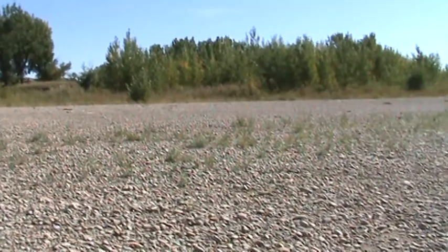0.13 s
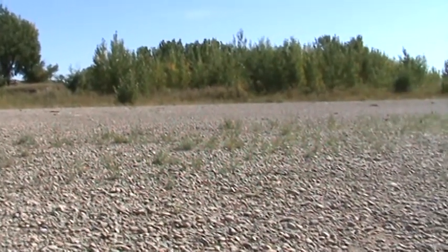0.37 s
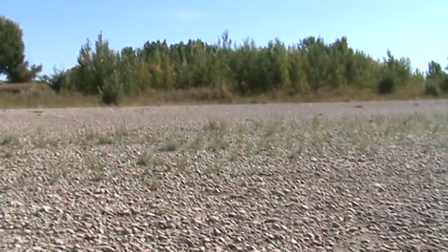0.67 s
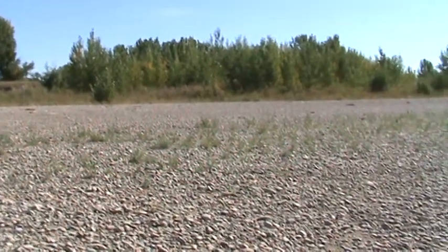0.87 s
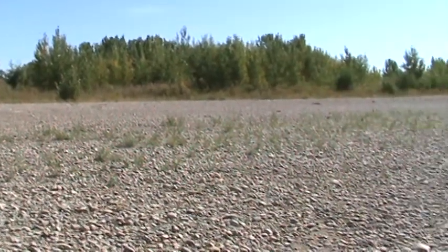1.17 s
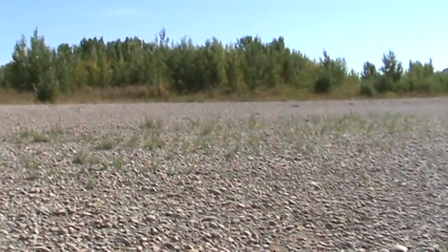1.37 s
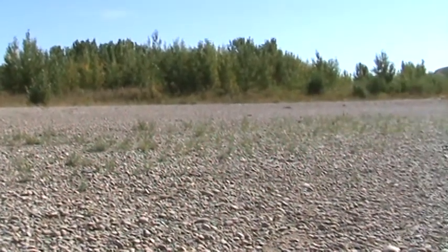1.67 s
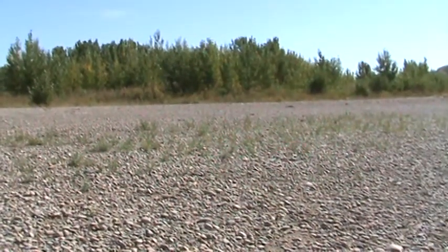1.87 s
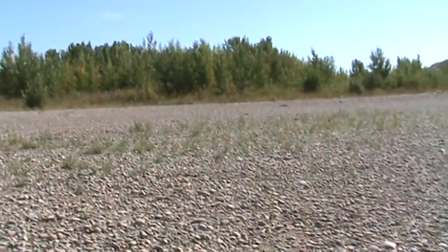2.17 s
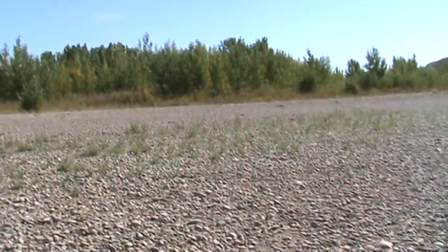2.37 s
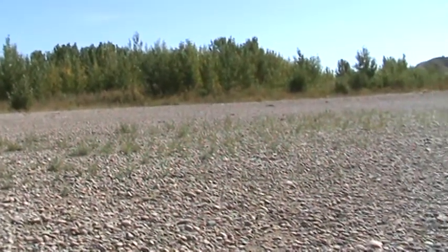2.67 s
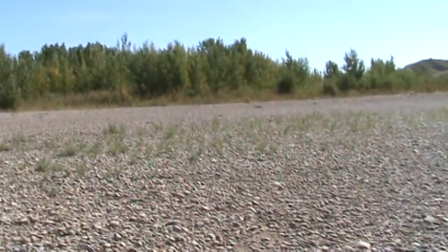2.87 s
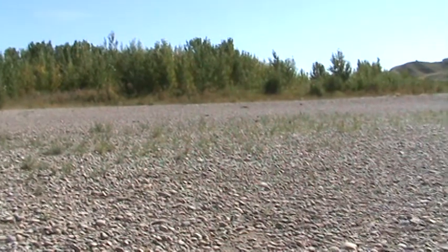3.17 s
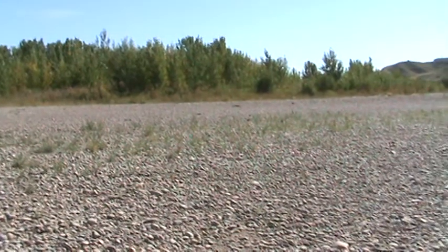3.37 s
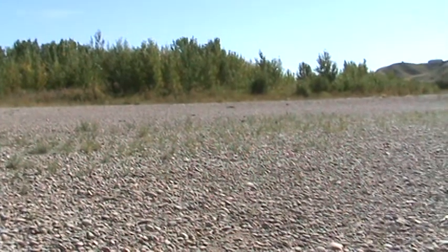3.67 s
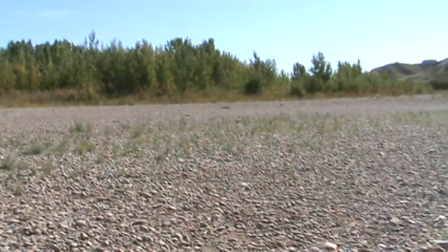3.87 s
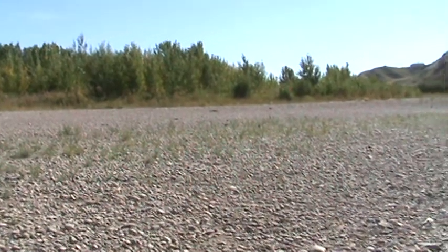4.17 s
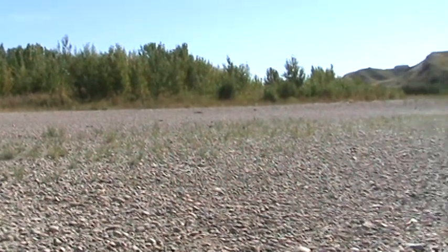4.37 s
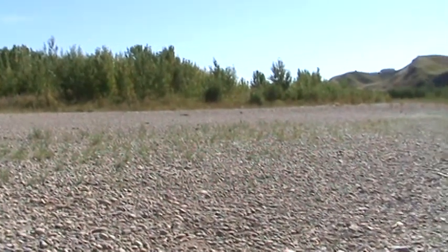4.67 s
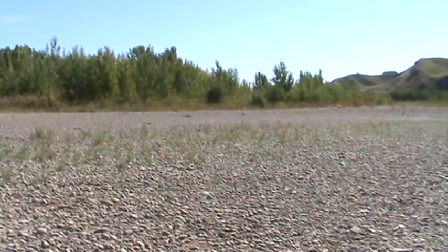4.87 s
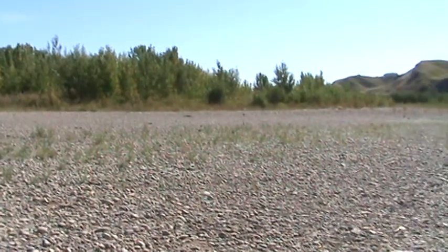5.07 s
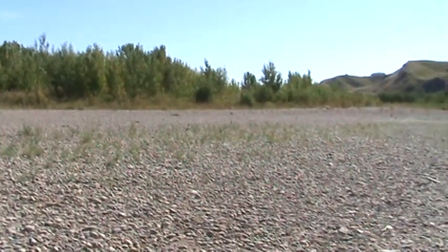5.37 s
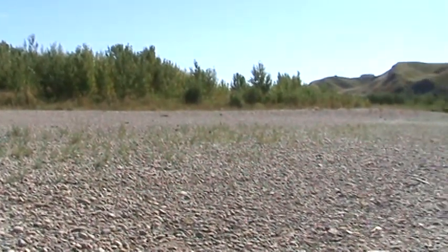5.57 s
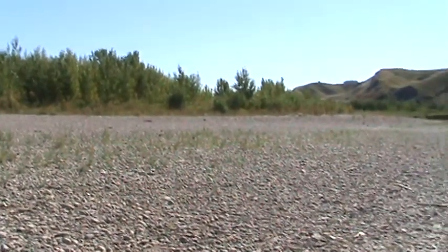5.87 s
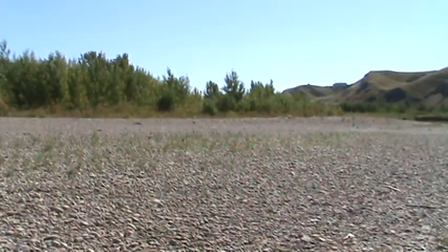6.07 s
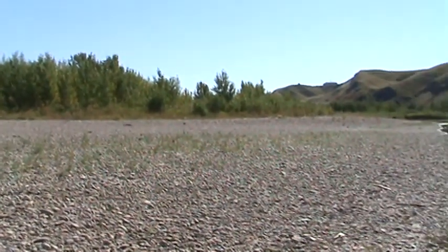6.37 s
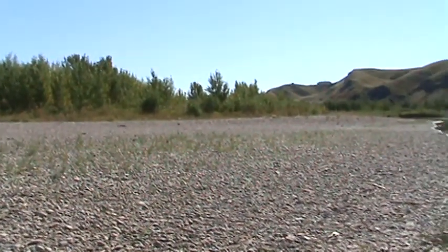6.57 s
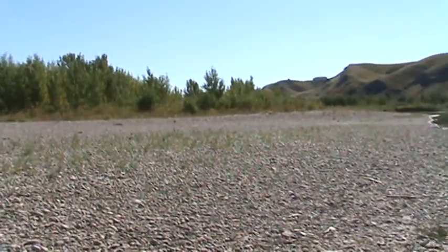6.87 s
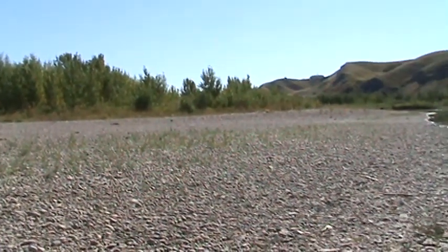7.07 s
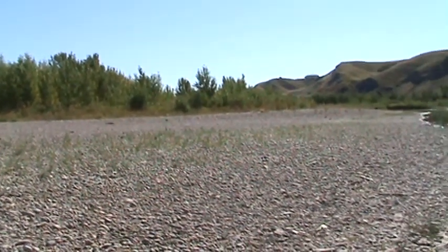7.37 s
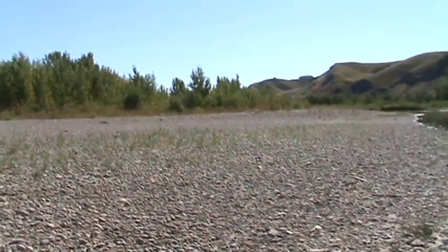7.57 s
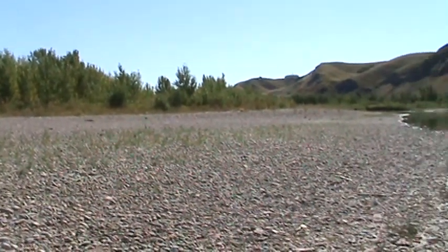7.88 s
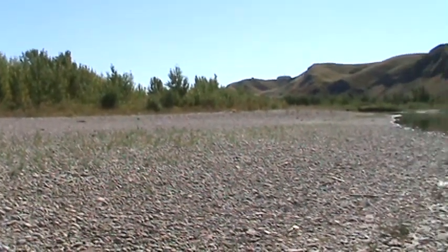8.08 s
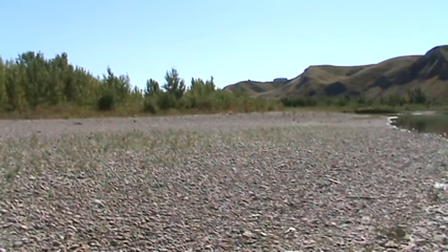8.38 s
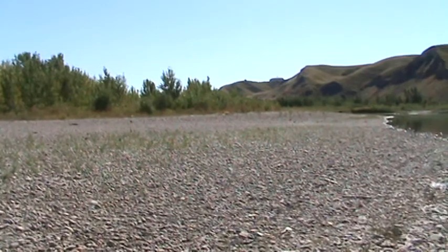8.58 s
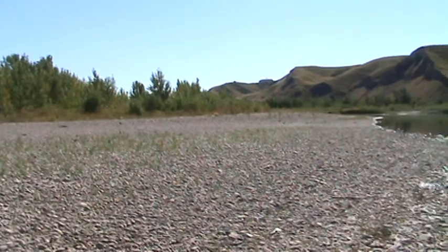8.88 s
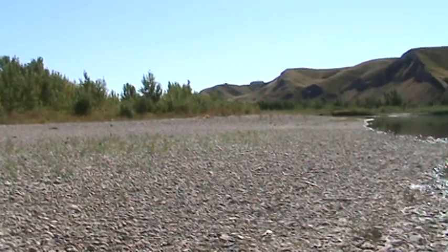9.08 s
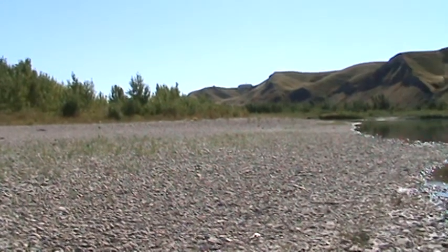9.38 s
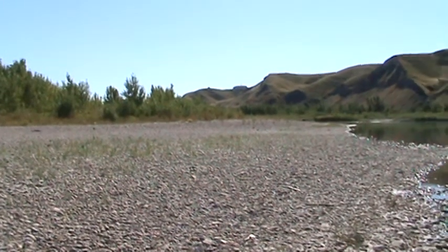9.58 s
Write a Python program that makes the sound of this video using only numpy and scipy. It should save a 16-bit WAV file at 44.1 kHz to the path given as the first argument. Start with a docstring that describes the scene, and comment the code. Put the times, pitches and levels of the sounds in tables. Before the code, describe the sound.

Hollow knocks from a shifting grip, then irregular crunches and sharp clacks of loose cobbles underfoot, over quiet open air and faint hiss.

```python
"""River cobbles clack together, dry, as someone turns slowly on them, holding a camera.
Each clack is a brief jolt with a sharp tick, scattered by the bed; grit is many random tiny contacts.
Knocks of the shifting grip ring the camera's shell at its two microphones; finger rubs are sticky jerks.
Low bumps are short bursts of dull noise, and still air and camera hiss are steady filtered noise."""
import sys
import numpy as np
from scipy import signal
from scipy.fft import rfft, irfft
from scipy.io import wavfile
from scipy.ndimage import uniform_filter1d

SR = 44100
rng = np.random.default_rng(int(sys.argv[2]) if len(sys.argv) > 2 else 0)


def wrap_up_sound(samples):
    """Save the sound to the file named by the first command line argument, as 16-bit audio."""
    columns = np.atleast_2d(samples).T
    # keep every value between -1 and 1, then stretch to whole-number steps
    tamed = np.clip(columns, -1, 1)
    steps = np.round(tamed * 32767).astype(np.int16)
    wavfile.write(sys.argv[1], SR, steps)


N = 429093


def amp(db):
    """Turns decibels into a plain gain."""
    return 10 ** (np.asarray(db) / 20)


def evened(x):
    """Scales a sound to an average (rms) level of 1."""
    return x / np.sqrt(np.mean(x ** 2) + 1e-20)


def burst(x, size):
    """Scales a short sound to the energy of size samples at level 1."""
    energy = np.mean(np.sum(x ** 2, -1))
    return x * np.sqrt(size / (energy + 1e-20))


def read(points, hz):
    """Reads a table of (frequency, value) at any frequency, on a log scale."""
    f, value = np.transpose(points)
    return np.interp(np.log(hz + 1), np.log(f + 1), value)


def add(mix, s, sound):
    """Mixes a sound in at s seconds, cut off at the end of the mix."""
    part = mix[:, max(round(s * SR), 0):][:, :sound.shape[-1]]
    part += sound[..., :part.shape[-1]]


def convolve(x, taps):
    """Lets every sample of x set off a copy of taps, keeping the length of x."""
    return signal.oaconvolve(np.atleast_2d(x), np.atleast_2d(taps), axes=1)[:, :x.shape[-1]]


def colour(x, spectrum, size=2048):
    """Causal filter with the given spectrum: clicks keep their sharp fronts."""
    hz = abs(np.fft.fftfreq(size, 1 / SR))
    log_gain = np.log(amp(read(spectrum, hz)))
    response = np.exp(signal.hilbert(log_gain).conj())  # minimum phase: the energy comes early
    return convolve(x, np.fft.ifft(response).real[:size // 2])


def pair(x, same):
    """Two unrelated signals become a left and right with the given likeness."""
    same = np.clip(same, -1, 1)
    mid, side = x[0] * np.sqrt(1 + same), x[1] * np.sqrt(1 - same)
    return np.array([mid + side, mid - side]) / np.sqrt(2)


def lead(x, radians):
    """The shell shakes the two microphones out of step."""
    return np.array([(x * np.exp(side * .5j * radians)).real for side in (1, -1)])


def grains(count, per_s, spread_db):
    """Random contacts, many small and a few large, on two unrelated channels."""
    happens = rng.random(count)
    size = amp(abs(spread_db) * np.minimum(rng.exponential(1, count), 3)) * (happens < per_s / SR)
    return size * rng.standard_normal((2, count))


def strokes(rows):
    """Gain of movements that swell and stop: rows (start [s], length [s], level [dB])."""
    gain = np.zeros((1, N))
    for s, length, db in rows:
        swell = signal.windows.tukey(round(max(length, .01) * SR), .7)
        add(gain, s, amp(db) * swell)
    return gain


# colour of the still air and the camera's own hiss: (frequency [Hz], relative level [dB per Hz])
AIR_COLOUR = [(25, -13.5), (105, 0.5), (300, -6.5), (500, -3.5), (700, -11), (1000, -12.5), (1260, -9.5),
              (1500, -11.5), (2200, -12), (2900, -17), (4450, -10), (4800, -18), (6300, -17.5),
              (8500, -20.5), (15500, -24.5)]
# how alike left and right are: (frequency [Hz], likeness [0 to 1])
AIR_LIKENESS = [(100, 1), (300, 0.96), (500, 0.69), (800, 0.36), (3000, 0.11), (4400, 0.54), (5200, 0.21),
                (14000, .8)]


def air(level_db=-59):
    """A steady quiet floor of filtered noise, nearly mono in the bass."""
    hz = np.fft.rfftfreq(N, 1 / SR)
    noise = pair(rfft(rng.standard_normal((2, N))), read(AIR_LIKENESS, hz))
    return amp(level_db) * evened(irfft(noise * amp(read(AIR_COLOUR, hz)), N))


# colour of grit between stones, here and in later sounds: (frequency [Hz], relative level [dB per Hz])
GRAVEL_COLOUR = [(120, -17), (300, -11.5), (600, -8.5), (1200, -6), (2000, -14), (3000, -14.5), (4300, -34),
                 (6600, -32), (12000, -55)]


def settling(level_db=-65, scatter_t60=0.033):
    """Now and then a stray pebble shifts faintly and rattles into place."""
    t = np.arange(2000) / SR
    rattle = (t == 0) + 0.14 * rng.standard_normal(len(t)) * amp(-60 * t / scatter_t60)
    shifts = colour(pair(grains(N, per_s=39, spread_db=1.5), 0.62), GRAVEL_COLOUR)
    return amp(level_db) * evened(convolve(shifts, rattle))


# the fingers slide around every knock: start before it [s], length [s],
# relative level at a usual knock [dB], dB more per dB of the blow
SLIDE_LEAD_S, SLIDE_S, SLIDE_DB, SLIDE_GROWTH = 0.1, 0.29, -58, 0.32
USUAL_KNOCK_DB = -38


def slides():
    """Each knock is part of a shift of the grip: rows (start [s], length [s], relative level [dB])."""
    return [(s - SLIDE_LEAD_S, SLIDE_S, SLIDE_DB + SLIDE_GROWTH * (db - USUAL_KNOCK_DB))
            for s, db, _ in KNOCKS]


BASS_LEAD = -1.0  # radians: the right microphone moves first
# fingers drag across the shell: (time [s], length [s], relative level [dB])
RUBS = [(2.82, 0.3, -53), (3.11, 0.08, -39.5), (4.17, 0.2, -54), (4.255, 0.074, -42.5), (4.605, 0.086, -37),
        (8.035, 0.054, -48.5), (8.91, .29, -47.5), (9.23, 0.093, -50.5)]
# colour of skin rubbing the shell: (frequency [Hz], relative level [dB per Hz])
RUB_COLOUR = [(50, -11), (130, 1.5), (400, -3), (680, -9.5), (900, -2), (1050, -4.5), (1260, 2),
              (1470, -12), (1840, -5), (2300, -14), (2800, -21), (4300, -17.5), (4800, -27), (9000, -41),
              (13000, -48)]


def grip(rub_db=1, hold_db=-66, loose=0.16, smear_t60=0.025):
    """Skin sticks and slips in tiny jerks, each smeared by the ringing shell."""
    t = np.arange(1500) / SR
    smears = rng.standard_normal((4, len(t))) * amp(-60 * t / smear_t60)  # each finger has its own path
    jerks = sum(convolve(grains(N, per_s=130, spread_db=4.0), smear) for smear in smears)
    slips = colour(jerks, RUB_COLOUR)
    whole_shell = lead(signal.hilbert(slips[0]), BASS_LEAD)
    rub = whole_shell + loose * slips[1] * np.array([[1], [-1]])
    movement = np.maximum(strokes(RUBS), strokes(slides()))
    return (amp(rub_db) * movement + amp(hold_db)) * evened(rub)


# dull bumps as the weight settles: (time [s], level [dB])
BUMPS = [(.068, -44.5), (0.907, -43.5), (1.467, -36.5), (1.755, -49.5), (4.646, -44), (4.8, -51),
         (6.626, -46)]
# colour of a bump: (frequency [Hz], relative level [dB per Hz])
BUMP_COLOUR = [(20, -12), (60, -6), (110, 8.5), (220, 2), (330, -22), (700, -31), (2000, -67)]


def bumps(t60=0.11, rise_s=0.0037):
    """A short low rumble travels through the arms into the camera."""
    out, t = np.zeros((2, N)), np.arange(12000) / SR
    envelope = (1 - np.exp(-t / rise_s)) * amp(-60 * t / t60)
    for s, db in BUMPS:
        shudder = pair(rng.standard_normal((2, len(t))), 0.99) * envelope
        add(out, s, amp(db) * burst(colour(shudder, BUMP_COLOUR), size=882))
    return out


def taps(within_s=.06, tap_db=-54, spread_db=2, thud_db=-3):
    """A second finger lands lightly just before or after each knock: rows as for the knocks."""
    chance = rng.uniform(-1, 1, (len(KNOCKS), 2))
    return [(s + within_s * when, tap_db + spread_db * size, thud_db)
            for (s, _, _), (when, size) in zip(KNOCKS, chance)]


# knocks on the shell: (time [s], ring level [dB], thud level above the ring [dB])
KNOCKS = [(.072, -43.5, 5.5), (.303, -39.5, -22), (.319, -35.5, -9), (0.375, -43.5, -15), (.444, -37, -8.5),
          (.579, -36.5, 0), (0.642, -36, -22), (.711, -44, 2), (.83, -48, -2), (.949, -42, -0.5),
          (.97, -34, -0.5), (1.074, -24, 0), (1.086, -36, 2), (1.131, -29, -5.5), (1.167, -21.5, -6),
          (1.263, -30.5, 6.5), (1.286, -41.5, 0.5), (1.346, -39, 0.5), (1.471, -41, 0.5), (3.142, -43, -5),
          (3.211, -23.5, -0.5), (4.074, -51, 1.5), (4.12, -39, -1.5), (4.262, -44, -4),
          (4.648, -40.5, -0.5), (5.045, -39.5, -5.5), (5.128, -48.5, 1.5), (5.353, -32, -2),
          (5.534, -32, 1.5), (5.647, -41.5, -7), (5.841, -45, -4.5), (5.917, -40, -6.5), (6.331, -22, -4.5),
          (6.56, -46.5, 1.5), (6.625, -21, -4.5), (8.074, -41.5, -8), (8.857, -49.5, -3), (8.939, -41, -3),
          (9.095, -44, 3.5), (9.385, -43.5, -3.5), (9.432, -49.5, 0), (9.581, -44, 0)]
# ways the shell rings, before each blow's random changes:
# (frequency [Hz], relative level [dB], time to fall 60 dB [s], lead of the left microphone [radians])
SHELL = [(778, -4.5, 0.019, -1.9), (922, -5.5, 0.037, -1), (1087, 0.5, 0.022, -1.4),
         (1240, -4, 0.039, -0.083), (1330, -12, 0.068, -1.96), (1541, -10.5, 0.033, -1.3),
         (1800, -8.5, 0.036, 1.22), (1883, -11, 0.039, 0.99), (2300, -21, 0.036, -1.7)]
# colour of the shell being pushed: (frequency [Hz], relative level [dB per Hz])
THUD_COLOUR = [(40, -29), (70, -5), (100, -2), (150, 2), (260, -0.5), (410, 2.5), (520, -6), (750, -15.5),
               (2000, -64)]
# colour of loose parts: (frequency [Hz], relative level [dB per Hz])
RATTLE_COLOUR = [(1200, -29), (2200, 7.5), (2800, -5.5), (3500, 1), (4300, -3), (4700, -8), (6000, -13),
                 (10000, -23), (15000, -54)]
# rattle beside the ring, before rattle_gain_db: (time [s], relative level [dB])
LOOSENESS = [(0, -11.5), (1.1, -14.5), (3.1, -8), (6.6, -7.5), (8.1, -11), (9.6, -11)]


def knocks(vary_db=3, chatter_db=-10, chatter_t60=0.056, rattle_t60=0.038, thud_t60=0.079,
           shake=0.41, rise_s=0.0018, rattle_gain_db=-1):
    """Each blow pushes the whole shell, rings its modes and makes loose parts chatter."""
    out, t = np.zeros((2, N)), np.arange(4400) / SR
    hz, db, t60, phase = np.transpose(SHELL)[:, :, None]
    rise = 1 - np.exp(-t / rise_s)
    for s, ring_db, weight_db in KNOCKS + taps():
        thud_db = ring_db + weight_db
        rattle_db = ring_db + np.interp(s, *np.transpose(LOOSENESS)) + rattle_gain_db

        # the place of the blow weights the modes
        size, detune, start = rng.standard_normal((3, len(SHELL), 1))
        turns = 2 * np.pi * hz * (1 + 0.017 * detune) * t + np.pi * start
        modes = amp(db + vary_db * size - 60 * t / t60) * np.exp(1j * turns)
        ring = burst(lead(modes, phase).sum(1) * rise, size=882)
        chatter = grains(len(t), per_s=1400, spread_db=8.5)[0] * amp(-60 * t / chatter_t60)
        ring = ring + amp(chatter_db) * burst(convolve(ring, chatter), size=882)
        add(out, s, amp(ring_db) * burst(ring, size=882))

        contacts = pair(grains(len(t), per_s=9000, spread_db=3), 0.31)
        rattle = colour(contacts * rise * amp(-60 * t / rattle_t60), RATTLE_COLOUR)
        add(out, s, amp(rattle_db) * burst(rattle, size=882))

        shaking = burst(rng.standard_normal(len(t)) * amp(-60 * t / thud_t60), size=1)
        push = (t == 0) + shake * shaking
        padded = np.pad(colour(push, THUD_COLOUR)[0], SR // 100)  # room for the phase shift
        thud = lead(signal.hilbert(padded), BASS_LEAD)
        add(out, s - 1 / 100, -amp(thud_db) * burst(thud, size=882))
    return out


def jolt(hz, t60_at_1khz=0.0015, size=600):
    """A struck cobble jerks for a cycle or two; small stones are higher and briefer."""
    t = np.arange(size) / SR
    envelope = (hz * t) ** 4 * amp(-60 * t / t60_at_1khz * np.sqrt(hz / 1e3))
    motion = envelope * np.sin(2 * np.pi * (hz * t + rng.random()))
    return burst(np.gradient(motion), size=220)


def pebbles(per_s, spread_db, middle_hz=1250, octaves=0.77, count=12):
    """Many small stones, each giving a dry tick at its own pitch."""
    pitches = middle_hz * 2 ** (octaves * np.linspace(-2, 2, count))
    shares = signal.windows.gaussian(count, count / 4)
    shares = shares / shares.sum()
    total = np.zeros((2, N))
    for hz, share in zip(pitches, shares):
        contacts = pair(grains(N, per_s * share, spread_db), 0.77)
        total += convolve(contacts, jolt(hz, t60_at_1khz=.0012))
    return evened(total)


# weight rolls over the pebbles at each step: (time [s], relative level [dB])
ROLLS = [(1.301, -50), (1.55, -50), (1.879, -51), (2.1, -50), (2.63, -53.5), (3.25, -55), (5.69, -55.5),
         (6.201, -55), (6.449, -58), (6.841, -50.5), (7.36, -52), (7.7, -56.5), (7.98, -57.5)]
ROLL_S = .33  # length of one roll [s]
# colour of sand, also in stones and scrapes: (frequency [Hz], relative level [dB per Hz])
SAND_COLOUR = [(1500, 8), (3000, 9), (5000, 4.5), (7000, -1), (10500, -11.5), (12000, -23), (16000, -44)]


def crunch(pebble_db=-3, rustle_db=-6, sand_db=-12):
    """Pebbles tick over a rustle of grit and sand as the weight shifts."""
    sand = evened(colour(pair(grains(N, per_s=520, spread_db=2.5), 0.85), SAND_COLOUR))
    rustle = evened(colour(pair(grains(N, per_s=2000, spread_db=4.5), 0.38), GRAVEL_COLOUR))
    ticks = pebbles(per_s=200, spread_db=4.0)
    bed = amp(pebble_db) * ticks + amp(rustle_db) * rustle + amp(sand_db) * sand
    return strokes([(s, ROLL_S, db) for s, db in ROLLS]) * bed


def clumped(x, patchy_db, frame_count=5, bin_count=8):
    """Grit gives way in clumps, each lasting some 15 ms with its own colour."""
    z = signal.stft(x, nperseg=256)[2]
    patches = uniform_filter1d(rng.standard_normal(z.shape[1:]), bin_count, 0)
    patches = uniform_filter1d(patches, frame_count, 1)
    gain = evened(amp(patchy_db * evened(patches)))
    return signal.istft(z * gain, nperseg=256)[1][:, :N]


def strays(above_db=2, spread_db=5.5, middle_hz=1500, octaves=0.9, count=2):
    """Every step tips a few small stones at random: rows as for the stones."""
    chance = rng.uniform(-1, 1, (len(ROLLS), count, 3))
    return [(s + ROLL_S * (1 + when) / 2, db + above_db + spread_db * size,
             middle_hz * 2 ** (octaves * pitch))
            for (s, db), tipped in zip(ROLLS, chance) for when, size, pitch in tipped]


# stone against stone, before the last change of +0.4 dB left and -0.4 dB right: (time [s], relative level [dB],
# pitch [Hz])
STONES = [(1.417, -43.5, 2780), (1.6856, -31.5, 4500), (1.7511, -26.5, 1760), (1.89, -30.5, 760),
          (1.9183, -38, 860), (1.9372, -32.5, 830), (1.9885, -39.5, 1030), (2.066, -39, 765),
          (2.2594, -30.5, 1100), (2.2884, -39.5, 1200), (2.327, -43, 1220), (2.5085, -39, 2850),
          (2.87, -37, 1040), (2.889, -40, 1400), (3.2739, -29, 1330), (3.334, -42, 1430),
          (3.4662, -40.5, 1340), (3.472, -38.5, 790), (4.7305, -47.5, 1770), (5.806, -38.5, 1570),
          (5.889, -34, 1660), (6.251, -31, 2300), (6.349, -19.5, 1800), (6.3923, -30.5, 1480),
          (6.4071, -22.5, 1750), (6.448, -37.5, 1550), (6.4869, -19.5, 1770), (6.734, -41, 1790),
          (6.755, -39, 1570), (7.1562, -32, 860), (7.3233, -35.5, 1080), (7.3825, -35, 3000),
          (8.02, -48.5, 2480), (8.765, -45.5, 1160)]
# gritty edge on a usual clack, before edge_db, lowest while the feet are on clean cobbles:
# (time [s], relative level [dB])
GRIT = [(2, -12.5), (3.4, -13), (5.8, -18), (6.7, -18), (7.1, -8), (8, -14)]
# each dB of a harder clack takes EDGE_LOSS dB off its share of edge
USUAL_CLACK_DB, EDGE_LOSS = -32.5, 0.49


def stones(edge_db=-1, edge_t60=0.027, scatter_db=-13, scatter_t60=0.081, graze_db=-21):
    """Stones graze, then strike with a sharp tick; the bed around scatters the sound."""
    out, t = np.zeros((2, N)), np.arange(3000) / SR
    for s, db, hz in STONES + strays():
        sharp_db = np.interp(s, *np.transpose(GRIT)) - EDGE_LOSS * (db - USUAL_CLACK_DB)
        hiss = pair(rng.standard_normal((2, len(t))), 0.78)
        tick = colour(hiss * amp(-60 * t / edge_t60), SAND_COLOUR)
        clack = jolt(hz, size=len(t)) + amp(sharp_db + edge_db) * burst(tick, size=220)

        echoes = pair(grains(len(t), per_s=4000, spread_db=3.5), 0.79)
        bed = echoes * amp(-60 * t / scatter_t60) * (t > .001)
        scattered = burst(convolve(clack, bed), size=220)
        add(out, s, amp(db) * (clack + amp(scatter_db) * scattered))

        graze = colour(pair(rng.standard_normal((2, 220)), 0.92), GRAVEL_COLOUR)
        add(out, s - .004, amp(db + graze_db) * evened(graze))
    return out * amp(0) * np.array([[1], [-1]]) * 0 + out * amp([[.4], [-.4]])  # right slightly softer


# a sole scrapes over grit:
# (time [s], length [s], relative level [dB], sandy hiss beside the grit [dB])
SCRAPES = [(1.658, 0.044, -58, 17.5), (1.70, 0.077, -42, -3.5), (1.981, 0.015, -47.5, -12),
           (2.263, 0.055, -53, -12), (2.502, 0.057, -46.5, -11), (4.94, 0.1, -67, 8.5),
           (6.237, .03, -35, -29), (6.261, 0.076, -50.5, -6), (6.981, 0.029, -47.5, -10),
           (7.242, 0.083, -46, -4), (7.311, 0.11, -49, -3), (7.892, 0.017, -52, -13)]


def scrapes(chips_db=-3, grit_db=-2):
    """Dense grit slips under the sole, swelling and stopping; small chips tick within it."""
    chips = pebbles(per_s=600, spread_db=2.5, middle_hz=2000, octaves=.7)
    out = amp(chips_db) * strokes([row[:-1] for row in SCRAPES]) * chips
    for s, length, db, sand_db in SCRAPES:
        count = round(max(length, .01) * SR)
        slips = pair(grains(count, per_s=4000, spread_db=2.5), 0.94)
        slips = slips * signal.windows.tukey(count, .85)
        grit = evened(colour(slips, GRAVEL_COLOUR))
        sand = evened(colour(slips, SAND_COLOUR))
        add(out, s, amp(db + grit_db) * (grit + amp(sand_db) * sand))
    return out


def scene():
    """Feet on the stones, hands on the camera, quiet open air."""
    hands = grip() + bumps() + knocks()
    feet = clumped(crunch() + scrapes(), patchy_db=4) + stones()
    return air() + settling() + hands + feet


EDGE_HZ = 15900  # where the treble ends


def record(dry):
    """A smooth filter takes away the treble above the edge."""
    taps = signal.firwin(511, EDGE_HZ, window=("kaiser", 9), fs=SR)
    return signal.oaconvolve(dry, taps[None], "same")


dry = scene()
out = record(dry)
wrap_up_sound(out)
```